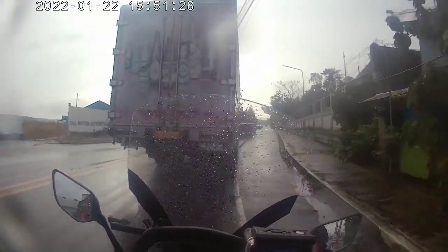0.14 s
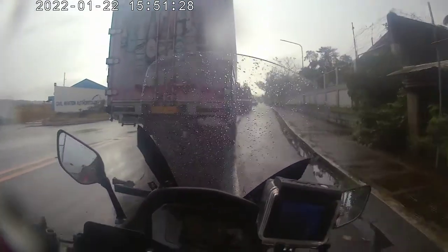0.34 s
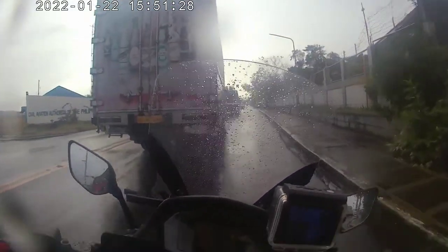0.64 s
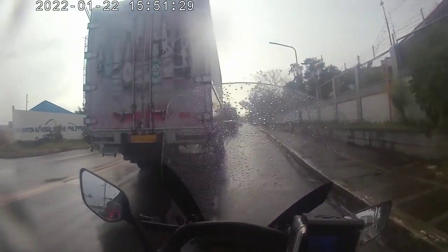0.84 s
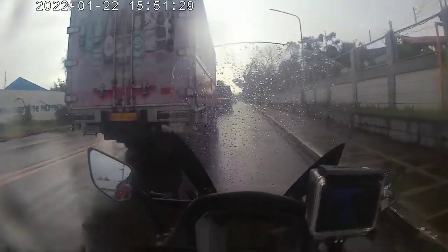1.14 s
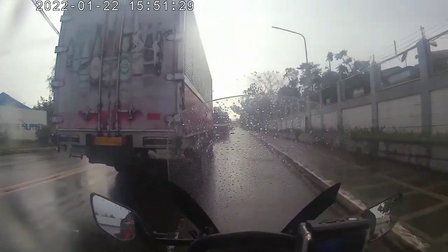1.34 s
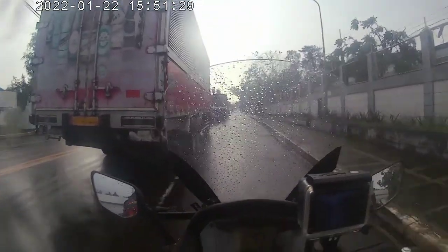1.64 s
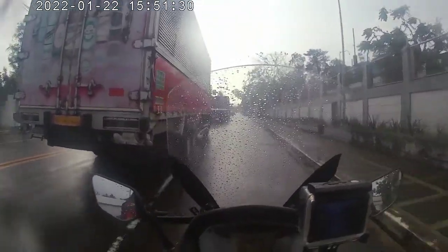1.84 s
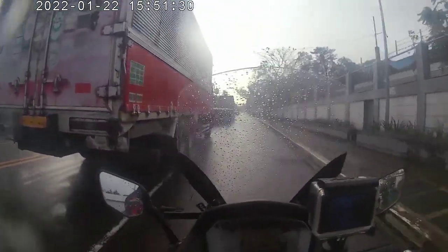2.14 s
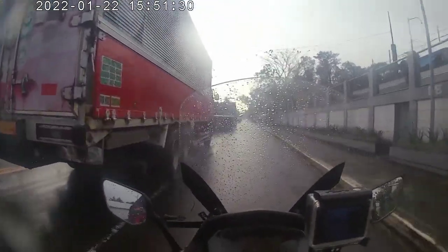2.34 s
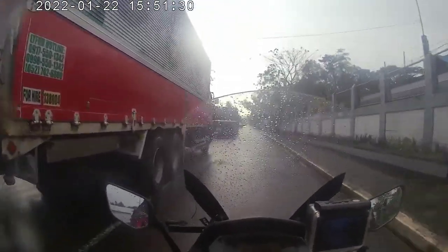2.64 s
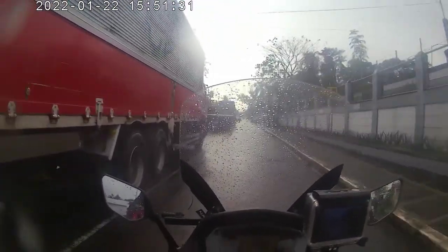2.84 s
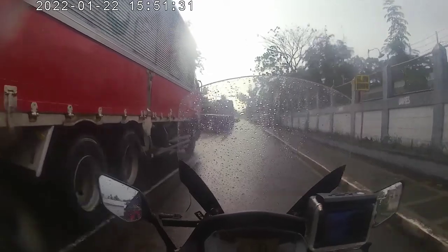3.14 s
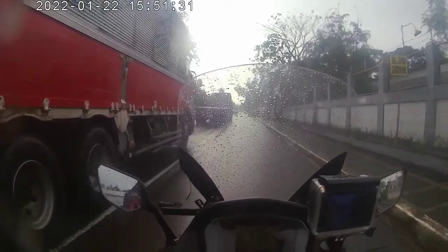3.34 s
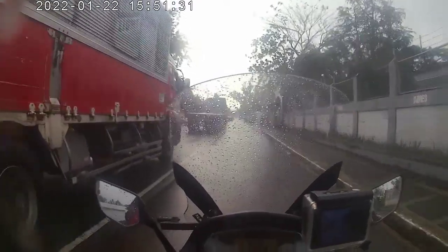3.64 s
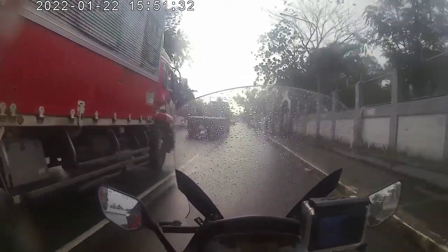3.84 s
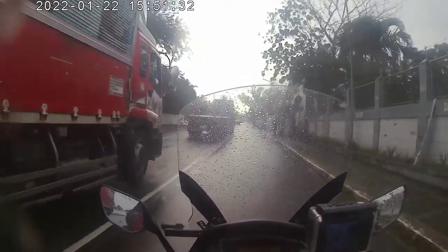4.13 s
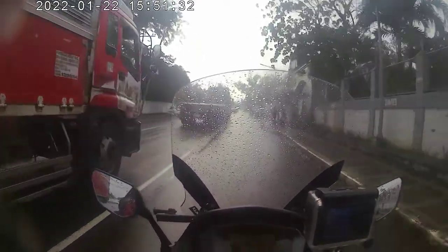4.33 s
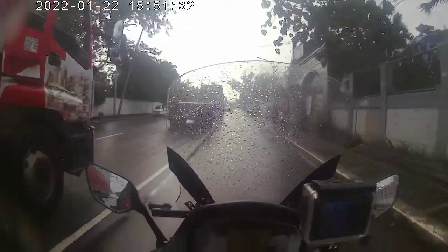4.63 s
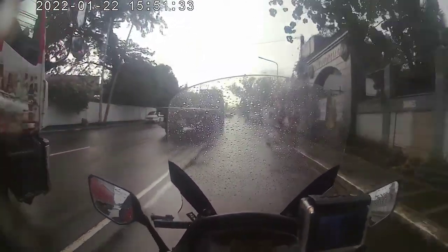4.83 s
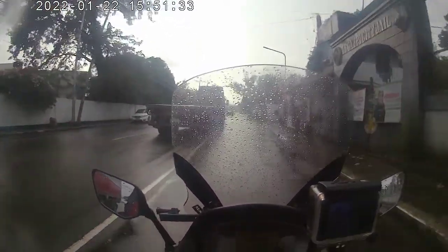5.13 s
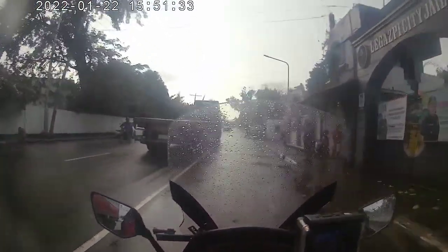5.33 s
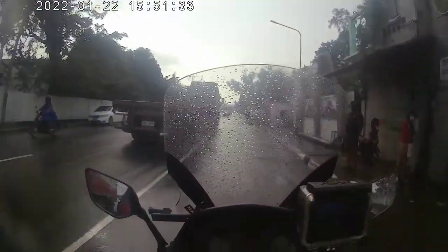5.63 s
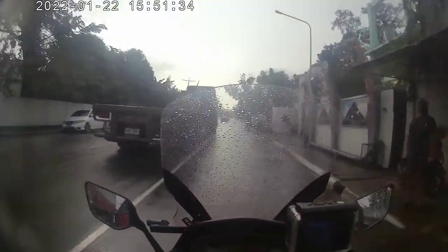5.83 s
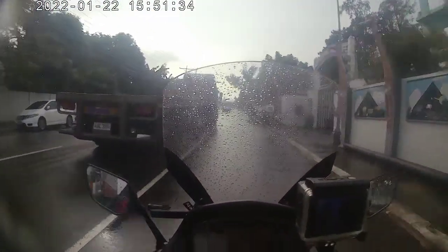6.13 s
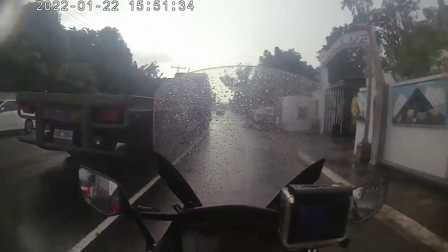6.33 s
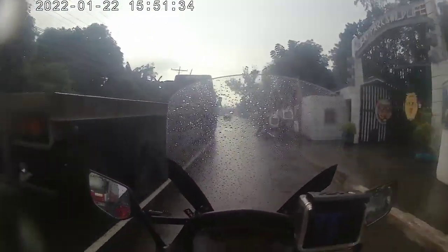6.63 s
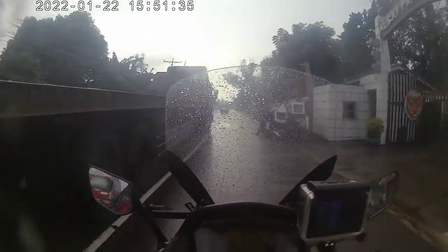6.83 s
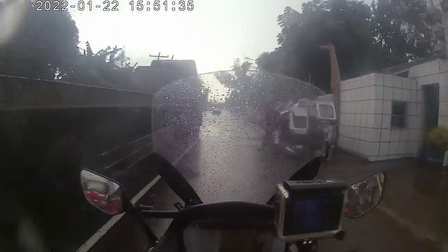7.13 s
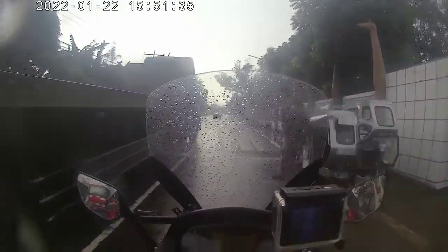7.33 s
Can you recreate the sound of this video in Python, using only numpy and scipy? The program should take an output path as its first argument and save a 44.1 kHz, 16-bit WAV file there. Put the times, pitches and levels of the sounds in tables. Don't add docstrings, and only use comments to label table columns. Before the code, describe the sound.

A motorcycle accelerates along a wet road, its droning exhaust half buried in distorted wind rumble, then its rider gives a few quick horn beeps.

```python
import sys
import numpy as np
from scipy import signal
from scipy.fft import rfft, irfft
from scipy.io import wavfile
from scipy.ndimage import uniform_filter1d

SR = 44100
rng = np.random.default_rng(int(sys.argv[2]) if len(sys.argv) > 2 else 0)


def nominal_scale(level):
    x = np.asarray(level, float) / 20
    return 10 ** x


def inscribe(sig):
    pcm = np.round(np.clip(np.atleast_2d(sig).T, -1, 1) * 32767)
    wavfile.write(sys.argv[1], SR, pcm.astype(np.int16))


N = 329427

# time_s, airstream_db, exhaust_load_db
RIDE = [(0, -12.5, -11), (.45, -5, -7), (1, -5, -4.5), (2, 2, -5), (2.7, -3, -7.5), (3.5, 0, -5),
        (4, -3, -10), (4.9, 3, -8.5), (5.8, 0.5, -10), (6.5, 3, -7.5), (7.47, 1, -7.5)]
# middle_s, strength_db, length_s
GUSTS = [(0.711, 8, 0.046), (0.896, 4, 0.063), (1.185, 5.5, 0.066), (1.428, 4.5, 0.05), (1.646, 8.5, 0.021),
         (2.035, 10.5, 0.13), (2.344, 2.5, 0.089), (2.488, 5.5, 0.062), (2.678, 6, 0.03),
         (2.728, -9, 0.032), (2.909, 1.5, 0.037), (3.233, 3, 0.017), (3.931, 7, 0.15), (4.04, 6.5, 0.016),
         (4.212, 3, 0.096), (4.834, 6, 0.032), (5.303, 3, 0.053), (5.337, 5, 0.047), (5.925, 3.5, 0.021),
         (5.976, 7.5, 0.089), (6.069, -1, 0.032), (6.602, 10, 0.07), (6.732, 11, 0.036),
         (6.896, 18.5, 0.019), (6.959, 4.5, 0.015), (7.047, 2.5, 0.035), (7.269, 6, 0.045),
         (7.306, 7, 0.042)]
# middle_s, strength_db, length_s
LULLS = [(0.334, -4, 0.038), (0.504, 0, 0.036), (1.003, -3, 0.081), (1.497, -3.5, 0.042),
         (1.571, -6, 0.077), (1.721, -4.5, 0.1), (1.791, -3.5, 0.037), (2.424, -0.5, 0.065),
         (2.559, -4, 0.054), (2.619, -3.5, 0.054), (2.953, 0, 0.047), (3.198, -4, 0.067), (3.322, 0, 0.065),
         (3.447, -5, 0.051), (3.582, 3, 0.024), (3.617, -8.5, 0.024), (3.861, -14, 0.018),
         (4.644, -3.5, 0.11), (5.502, -13.5, 0.044), (5.617, -5.5, 0.043), (5.807, -6, 0.16),
         (5.937, -5.0, 0.037), (6.181, -2.5, 0.055), (7.199, -7, 0.031)]
# middle_s, strength_db, length_s
JOLTS = [(0.454, 1.5, 0.093), (0.948, 3, 0.089), (1.207, 6.5, 0.028), (1.651, 8.5, 0.017),
         (1.866, 0.5, 0.034), (1.99, 10, 0.022), (2.629, 1.5, 0.032), (2.953, 2.5, 0.031),
         (3.298, 3.5, 0.082), (4.126, 4.5, 0.042), (4.629, 7.5, 0.096), (4.759, 4.5, 0.011),
         (5.063, 2.5, 0.08), (5.173, 8, 0.026), (5.238, 10, 0.014), (5.358, 4, 0.033), (6.211, 4, 0.017),
         (6.839, 4, 0.06), (7.254, 3.5, 0.08), (7.383, 5.5, 0.16)]


def evened(x):
    return x / np.sqrt(np.mean(x ** 2) + 1e-20)


def curve(rows, column):
    rows = np.array(rows)
    return np.interp(np.arange(N) / SR, rows[:, 0], rows[:, column])


def drift(length_s):
    size = int(length_s * SR) + 1
    once = uniform_filter1d(rng.standard_normal(N), size)
    return evened(uniform_filter1d(once, size))


def swells(rows):
    t = np.arange(0, N + 64, 64) / SR
    middle_s, db, length_s = np.transpose(rows)[:, :, None]
    bells = db * np.exp(-(1.9 * (t - middle_s) / length_s) ** 2)
    return np.interp(np.arange(N) / SR, t, bells.sum(0))


def resonate(x, hz, width_hz):
    return signal.lfilter(*signal.iirpeak(hz, hz / width_hz, SR), x)


def low_pass(x, hz, count):
    taps = signal.firwin(count, min(hz, 20000), window=("kaiser", 7), fs=SR)
    return signal.oaconvolve(x, taps, "same")


def spray():
    # centre_hz, width_hz, level_db
    hiss_bands = [(913, 170, -34.5), (1890, 520, -35.5), (3630, 870, -33)]
    splash_share, shield_share = 0.69, 0.68
    hiss = rng.standard_normal(N) * nominal_scale(3.0 * drift(0.012))
    water = sum(nominal_scale(db) * evened(resonate(resonate(hiss, hz, width), hz, width))
                for hz, width, db in hiss_bands)
    level_db = 0.59 * curve(RIDE, column=1) - 3.5
    level_db = level_db + splash_share * swells(JOLTS) - shield_share * swells(GUSTS)
    return water * nominal_scale(level_db)


def wind():
    # frequency_hz, density_db_per_hz
    rumble_colour = [(4, -24.5), (15, -1.5), (30, -1), (60, -3), (120, -8.5), (220, -14), (350, -16),
                     (600, -22.5), (1200, -36), (3000, -47.5), (4000, -57)]
    gust_share, lull_share = 0.45, 0.95
    hz = np.fft.rfftfreq(N, 1 / SR)
    f, density_db = np.transpose(rumble_colour)
    colour = nominal_scale(np.interp(np.log(hz + 1), np.log(f + 1), density_db, left=-30))
    rumble = evened(irfft(rfft(rng.standard_normal(N)) * colour, N))
    level_db = curve(RIDE, column=1) - 1.5 + 1.46 * drift(0.035)
    level_db = level_db + gust_share * swells(GUSTS) + lull_share * swells(LULLS)
    return nominal_scale(level_db) * rumble


def shoves():
    push_db, swing_hz = -7.5, 29.3
    t = np.arange(N) / SR
    out = np.zeros(N)
    sides = rng.choice([-1., 1.], len(GUSTS))
    for (middle_s, db, length_s), side in zip(GUSTS, sides):
        near = slice(round((middle_s - length_s) * SR), round((middle_s + length_s) * SR))
        u = t[near] - middle_s
        window = np.cos(.5 * np.pi * u / length_s) ** 2
        out[near] += side * nominal_scale(db + push_db) * np.cos(2 * np.pi * swing_hz * u) * window
    return out


def horn():
    # start_s, length_s, level_db
    taps = [
        (5.434, 0.037, 10),
        (6.325, 0.058, 11.5),
        (6.482, .08, 13),
        (6.635, .078, 13),
    ]
    trumpet_hz = [424, 503]
    trumpet_db = [-8, 0]
    tilt_db = -16.0
    attack_s, release_s, sag_db, bend = 0.0029, 0.027, -7.5, .05
    out = np.zeros(N)
    for start_s, length_s, db in taps:
        t = np.arange(0, length_s, 1 / SR)
        bent = t + bend * .015 * np.exp(-t / 0.019)
        buzz = sum(nominal_scale(level + tilt_db * k) * np.sin(2 * np.pi * (k + 1) * hz * bent)
                   for hz, level in zip(trumpet_hz, trumpet_db) for k in range(6))
        shape = np.minimum(np.minimum(t / attack_s, (length_s - t) / release_s), 1)
        out[round(start_s * SR):][:len(t)] += nominal_scale(db + sag_db * t / length_s) * buzz * shape
    return out


def muffler(x):
    delay_s_per_hz = 7e-5
    hz = np.minimum(np.fft.rfftfreq(N, 1 / SR), 1200)
    return irfft(rfft(x) * np.exp(-1j * np.pi * delay_s_per_hz * hz ** 2), N)


def engine():
    # time_s, firings_hz
    speed = [(0, 34), (.12, 35.6), (.3, 38.3), (.48, 41.8), (.8, 44.5), (1, 45.5), (1.4, 46.1),
             (1.85, 48.3), (2.6, 49), (3.85, 50.4), (4.2, 48.5), (4.7, 46.6), (5.2, 48.4), (5.55, 47.5),
             (6.55, 46.8), (6.8, 49.4), (7.12, 49.5), (7.47, 52.2)]
    # time_s, noise_share
    ragged = [(0, .25), (3.85, .3), (4, .9), (5.3, .8), (5.45, .35), (6.1, .45), (6.3, .8), (7.1, .5),
              (7.47, .4)]
    # centre_hz, width_hz, level_db
    cavity = [(400.6, 66, 4), (505.8, 73.7, 3), (980, 120, -35.5)]
    # multiple, level_db
    low_orders = [(1, -14), (2, -4), (3, -16), (4, -13)]
    shade_share, clear_share, kick_share = 0.34, 0.52, 0.67
    thump_db_per_hz, thump_full_hz = 0.48, 48.1

    firing_hz = curve(speed, column=1)
    turns = np.cumsum(firing_hz * (1 + .006 * drift(.03))) / SR
    strength = nominal_scale(2.23 * rng.standard_normal(1000))[(2 * turns).astype(int) % 1000]
    fire = np.diff(np.floor(turns), prepend=0)
    intake = np.diff(np.floor(turns + .5), prepend=0)
    puff = np.exp(-(turns % 1) / 0.6) * rng.standard_normal(N)
    pulses = muffler(strength * (fire + .18 * intake))
    drive = evened(pulses) + curve(ragged, column=1) * evened(puff)

    ring = np.zeros(N)
    for k, (hz, width, db) in enumerate(cavity):
        mode = evened(resonate(resonate(drive, hz, width), hz, 2 * width))
        ring += (-1) ** k * nominal_scale(db) * mode
    thump = sum(nominal_scale(db) * np.cos(2 * np.pi * round(k) * turns) for k, db in low_orders)
    thump = thump * nominal_scale(thump_db_per_hz * (firing_hz - thump_full_hz))

    level_db = curve(RIDE, column=2) - shade_share * swells(GUSTS)
    level_db = level_db - clear_share * swells(LULLS) + kick_share * swells(JOLTS)
    return nominal_scale(level_db) * (evened(ring) + thump)


def scene():
    jump_db = 0.93 * swells(JOLTS) - 0.5 * drift(0.022)
    jolted = spray() + wind() + shoves() + engine()
    return (jolted * nominal_scale(jump_db) + horn())[None]


def grain(x):
    hz, t, z = signal.stft(x, SR, nperseg=2048)
    smear = uniform_filter1d(abs(z), size=12, axis=0) * (hz[:, None] > 60)
    z = z + nominal_scale(-12.0) * smear * np.exp(2j * np.pi * rng.random(z.shape))
    return signal.istft(z, SR, nperseg=2048)[1][:N]


def band_limit(x):
    return signal.sosfilt(signal.butter(12, 15800, fs=SR, output="sos"), x)


def record(dry):
    narrow = low_pass(np.clip(dry[0], -.73, .73), 3780, count=61)
    boosted = np.clip(grain(narrow), -.713, .713) + .004
    grit = evened(resonate(rng.standard_normal(N), 4800, 3000))
    boosted = boosted + nominal_scale(-70 + curve(RIDE, column=1)) * grit
    return band_limit(boosted[None])


dry = scene()
out = record(dry)
inscribe(out)
```